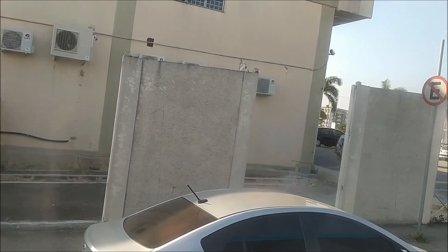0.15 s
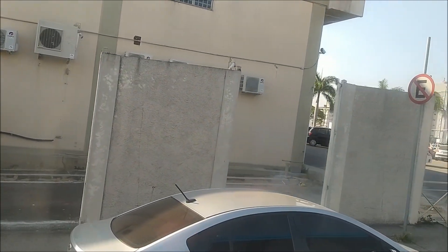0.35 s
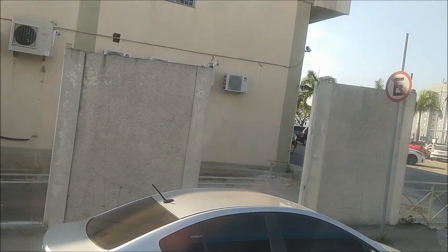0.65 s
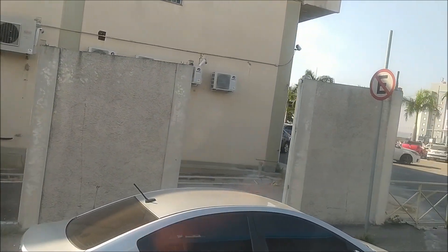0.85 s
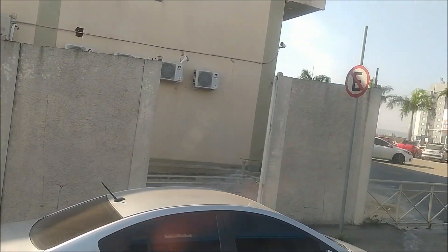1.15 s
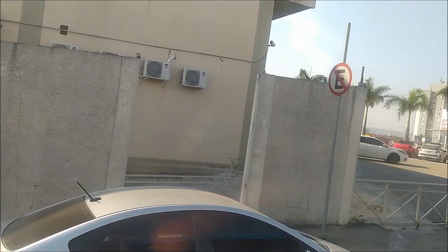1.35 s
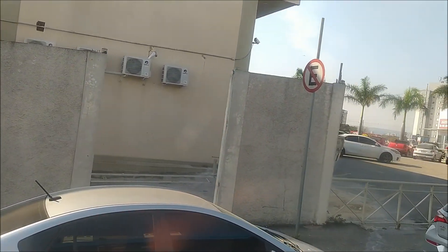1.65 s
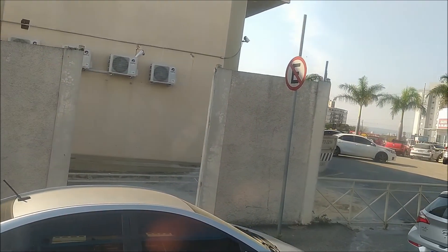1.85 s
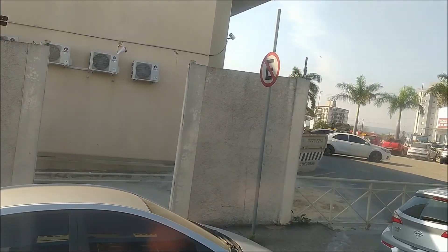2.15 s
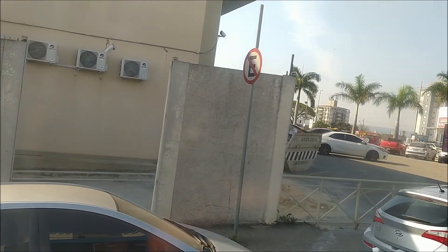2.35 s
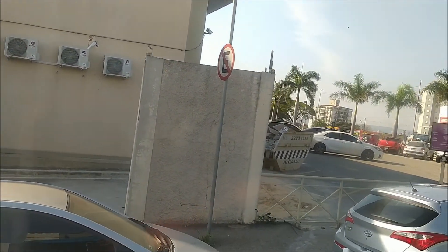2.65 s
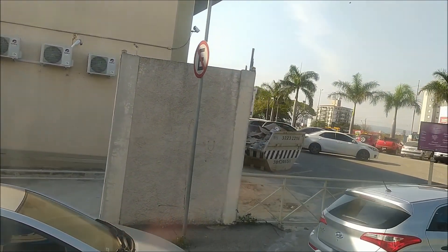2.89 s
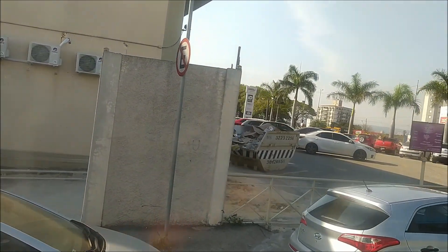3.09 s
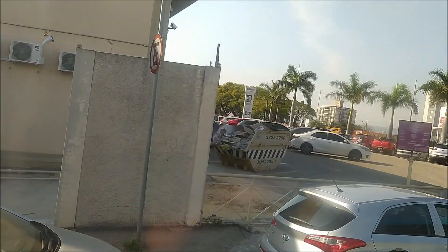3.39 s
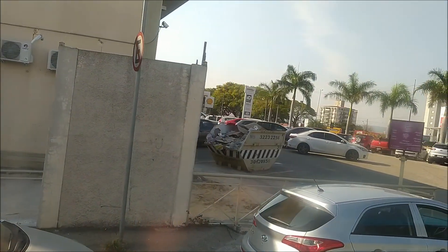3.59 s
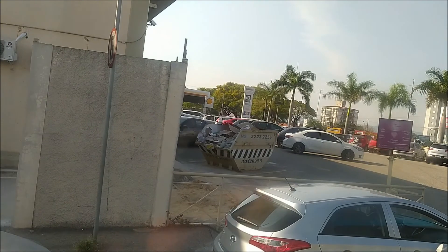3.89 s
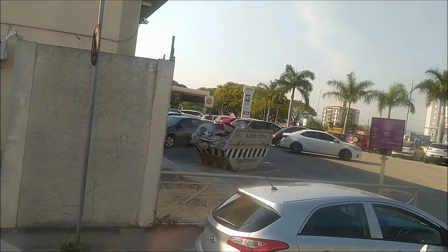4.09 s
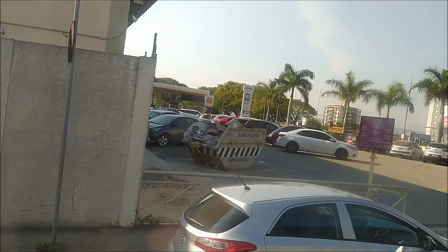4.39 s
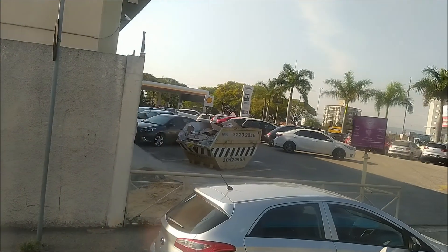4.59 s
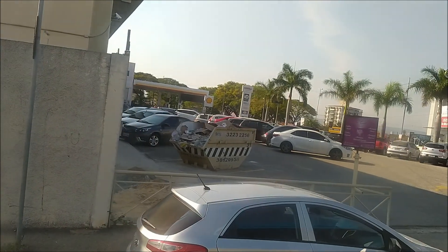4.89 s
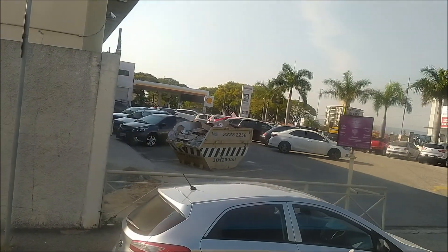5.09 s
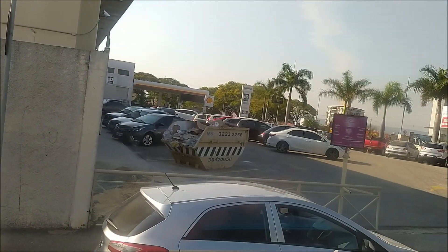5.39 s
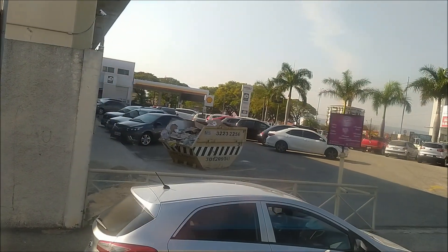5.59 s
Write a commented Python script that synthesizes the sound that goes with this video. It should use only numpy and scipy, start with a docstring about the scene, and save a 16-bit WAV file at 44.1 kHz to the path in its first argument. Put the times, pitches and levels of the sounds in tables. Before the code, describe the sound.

A heavy diesel drone sinks in pitch as road roar fades; at idle, a sharp air-brake hiss ends in falling squeaks.

```python
"""Diesel bus rolling to a stop

Heard from inside the cabin: the engine winds down from a pull to idle, its firing harmonics passed through
frame and floor modes. Road and fan roar is coloured noise ringing the cabin, with hiss and air at the windows.
A short hum slides up near the start and a faint gear whine follows the engine down.
At the stop brake air hisses out as a burst of noise, and the valve squeals in roughened falling tones."""
import sys
import numpy as np
from scipy import signal
from scipy.fft import rfft, irfft
from scipy.io import wavfile
from scipy.ndimage import uniform_filter1d

SR = 44100
rng = np.random.default_rng(int(sys.argv[2]) if len(sys.argv) > 2 else 0)


def int16_out(signal):
    """Quantize to a 16-bit WAV file."""
    q = np.round(np.clip(np.atleast_2d(signal).T, -1, 1) * 32767)
    wavfile.write(sys.argv[1], SR, q.astype(np.int16))


def invert_db(level):
    """Linear amplitude ratio for a level in decibels (20 dB per decade), elementwise."""
    return 10 ** (np.asarray(level, dtype=float) / 20)


N = 253117
TIME = np.arange(N) / SR  # s
FREQ = np.maximum(np.arange(N // 2 + 1) * SR / N, 1)  # Hz

# engine run-down: [t/s, firing rate f/Hz, effort level/dB]
ENGINE_RUN = [(0.0, 56.7, -28), (0.45, 55.4, -23), (0.75, 52.4, -24.5), (0.95, 50.6, -26.5),
              (1.2, 48.1, -25), (1.5, 46.2, -25), (1.95, 44.7, -26), (2.27, 43.9, -27.5),
              (2.49, 42.7, -33.5), (2.61, 40.9, -32), (2.72, 39.5, -31), (2.97, 36.4, -34.5),
              (3.1, 33.7, -36), (3.21, 31.3, -34), (3.33, 29.3, -32), (3.45, 28.9, -31), (4.2, 28.9, -33),
              (5.74, 28.8, -34)]
# cabin air resonances rung by the road: [f/Hz, half-power width/Hz, relative level/dB]
BOOM_MODES = [(30, 55, -10), (91, 40, -10), (150.3, 31.3, -3.5), (183, 37, -5.5)]
# drumming panels: [f/Hz, half-power width/Hz, relative level/dB]
PANEL_MODES = [(232, 35, -7.5), (284, 48.6, -8.5), (366.3, 62, -12), (448, 62, -18.5)]


def unit(x):
    """Scale to an rms of one."""
    return x / np.sqrt(np.mean(x ** 2))


def curves(table):
    """Columns of a table as straight lines in time."""
    s, *columns = np.transpose(table)
    return [np.interp(TIME, s, column) for column in columns]


def shape(points):
    """A (f/Hz, value) table read at every frequency, straight over log frequency."""
    hz, value = np.transpose(points)
    return np.interp(np.log(FREQ), np.log(hz), value)


def walk(rate):
    """Random levels held 1 / rate s and slewed twice; rms one."""
    hold = int(SR / rate)
    steps = np.repeat(rng.standard_normal(N // hold + 1), hold)
    slewed = uniform_filter1d(uniform_filter1d(steps, hold), hold)
    return unit(slewed[:N])


def swell(rows):
    """Smooth bumps in dB from (centre s, length s, dB) rows."""
    return sum(db * np.exp(-(2 * (TIME - s) / length) ** 2) for s, length, db in rows)


def burst(start_s, attack_s, hold_s, fall_db_per_s):
    """Gain that rises, holds and falls away."""
    since = TIME - start_s
    rise = np.clip(since / attack_s, 0, 1) ** 2
    return rise * invert_db(-fall_db_per_s * np.maximum(since - attack_s - hold_s, 0))


def glide(start_s, first_hz, resting_hz, settle_s):
    """Pitch that eases exponentially from its first to its resting value."""
    return resting_hz + (first_hz - resting_hz) * np.exp(-np.maximum(TIME - start_s, 0) / settle_s)


def cabin(hz, modes=BOOM_MODES + PANEL_MODES):
    """Gain of a set of resonances at a frequency, their powers summed."""
    power = sum(invert_db(db) ** 2 / (1 + (2 * (hz - centre) / width) ** 4) for centre, width, db in modes)
    return np.sqrt(power)


def diffuse(gain):
    """Noise of a given colour, mostly alike at both microphones in the bass and unrelated in the treble."""
    # sound field at the microphone pair: [f/Hz, side minus mid level/dB,
    # share of side in step with mid (+ leans left), share a quarter cycle ahead (+ left leads)]
    field = [(60, -39, 0, -.6), (120, -7, -0.16, -.5), (180, -19, -0.62, -.4), (219, 1, 0.17, 0.35),
             (255, -14, -0.33, -0.1), (360, -5.5, -0.37, 0.15), (450, -5, -0.029, -0.099),
             (610, -1, 0.28, .07), (870, 2.5, -0.35, 0.15), (1040, 3.5, -.43, -0.035),
             (1450, 1.5, -0.51, 0.33), (1990, 0, -.15, -0.37), (3400, 0.5, .18, -.08),
             (6460, -1, -0.0063, -1), (10300, -1, -.3, 0), (11600, 0, 0.83, 0), (14000, -0.5, 0.35, 1)]
    mid, other = rfft(rng.standard_normal((2, N))) * gain
    side_db, lean, lead = (shape(np.array(field)[:, [0, k]]) for k in range(1, 4))
    free = np.sqrt(np.clip(1 - lean ** 2 - lead ** 2, 0, 1))
    side = invert_db(side_db) * ((lean + 1j * lead) * mid + free * other)
    pair = irfft(np.array([mid + side, mid - side]), N)
    # the mid has an rms of one
    return pair / np.sqrt(np.mean(pair.mean(axis=0) ** 2))


def roar(road_db):
    """Road and fan noise ring the cabin; the window air flickers with small gusts."""
    # ringing seats, rails and glass: [f/Hz, half-power width/Hz, level over the body noise/dB]
    fittings = [(654, 16, -8.5), (986, 130, -14.5), (1030, 6.1, -19), (1405, 38, -8), (1903, 28, -0.5),
                (2036, 30, -1)]
    # body and road noise colour: [f/Hz, relative level per Hz/dB]
    body_colour = [(250, -39), (420, -7), (532, -6.5), (590, -6), (747, -12), (1010, -12), (1220, -20.5),
                   (1390, -18), (1790, -20.5), (1970, -21), (2190, -20), (2380, -24.5), (4000, -34.5),
                   (5200, -54), (8800, -120)]
    # lower hiss at the windows: [f/Hz, relative level per Hz/dB]
    hiss_colour = [(2060, -12), (3500, -8.5), (3760, -6), (4320, -4.5), (4950, -1), (5720, -3),
                   (6640, -3.5), (7470, -5), (8000, -3), (10400, -13), (17600, -120)]
    # air rushing at the windows: [f/Hz, relative level per Hz/dB]
    air_colour = [(4120, -41), (7000, -7), (7490, -9.5), (9890, 1), (11000, 0.5), (11600, -3), (12900, -17),
                  (14100, -10.5)]
    # the boom swells or sinks for a while: [centre t/s, length/s, level/dB]
    boom_swells = [(0.09, 0.09, 4.5), (1.272, 0.09, -0.5), (2.053, 1.08, -5), (2.823, 0.53, 3),
                   (3.273, 0.13, -3.5), (4.9, 1.3, -4)]
    # each noise at the loudest road level (dB) and the share of the road's fall that it follows
    boom_db, boom_share, panel_db, panel_share = -24.5, 0.96, -29.5, 0.99
    air_db, air_share, hiss_db, hiss_share = -52, 0.88, -55.5, 1

    fall_db = road_db - road_db.max()
    boom_level_db = boom_db + boom_share * fall_db + swell(boom_swells) + 0.82 * walk(8.1)
    boom = invert_db(boom_level_db) * diffuse(cabin(FREQ, BOOM_MODES))
    panel_level_db = panel_db + panel_share * fall_db + 1.44 * walk(8)
    panels = invert_db(panel_level_db) * diffuse(cabin(FREQ, PANEL_MODES))
    ringing = 1 + cabin(FREQ, fittings)
    body = invert_db(road_db + 0.37 * walk(10)) * diffuse(ringing * invert_db(shape(body_colour)))
    # the same gusts move the air and, half as far in dB, the hiss
    gusts_db = 1.4 * walk(14)
    hiss_level_db = hiss_db + hiss_share * fall_db + 0.5 * gusts_db + 0.74 * walk(6)
    hiss = invert_db(hiss_level_db) * diffuse(invert_db(shape(hiss_colour)))
    air = invert_db(air_db + air_share * fall_db + gusts_db) * diffuse(invert_db(shape(air_colour)))
    return boom + panels + body + hiss + air


def hum():
    """A clean tone gliding up towards its resting pitch as it fades, equal at both microphones."""
    # the hum: [start t/s, hold/s, first f/Hz, resting f/Hz, level/dB]
    hum_note = (0.13, 0, 146.5, 166.5, -18)
    rise_s, attack_s, fall_db_per_s = 0.117, 0.034, 81
    s, hold_s, first_hz, resting_hz, db = hum_note
    hz = glide(s, first_hz, resting_hz, rise_s)
    gain = np.sqrt(2) * invert_db(db) * burst(s, attack_s, hold_s, fall_db_per_s)
    return gain * np.sin(2 * np.pi * np.cumsum(hz) / SR)


def gear():
    """A faint whine at a multiple of the firing rate, louder where it crosses a ringing rail."""
    # ringing rail: [f/Hz, half-power width/Hz, level over the plain whine/dB]
    rail = [(1895, 16, 7)]
    multiple, level_db = 41.9, -64
    from_s, until_s, fade_s = 1.15, 2.3, .2  # fades in after from_s and out after until_s
    hz = multiple * curves(ENGINE_RUN)[0]
    engaged = np.clip(np.minimum(TIME - from_s, until_s + fade_s - TIME) / fade_s, 0, 1)
    gain = np.sqrt(2) * engaged * invert_db(level_db + 2.5 * walk(10)) * (1 + cabin(hz, rail))
    turn = 2 * np.pi * np.cumsum(hz) / SR + .5 * walk(10)
    apart = np.array([[0], [1.2]])  # phase at the left and right microphone, rad
    return gain * np.sin(turn + apart)


def whistle(hz, gain, rough_hz, spread):
    """A gliding tone whose size and phase wander within a narrow band, partly alike left and right."""
    turn = 2 * np.pi * np.cumsum(hz) / SR

    def rough_tone():
        return gain * (walk(rough_hz) * np.cos(turn) + walk(rough_hz) * np.sin(turn))

    mid, side = rough_tone(), rough_tone()
    return np.array([mid + spread * side, mid - spread * side])


def brake():
    """Air rushes from the brake valve, opening fast and dying away; the valve squeals as it closes."""
    # colour of the air: [f/Hz, relative level per Hz/dB]
    air_burst = [(2650, -34.5), (4500, -17), (4810, -21), (5540, 2.5), (8010, 4), (8680, 3), (10900, 7.5),
                 (13000, -12)]
    # squeals, each dropping in pitch: [start t/s, hold/s, first f/Hz, resting f/Hz, level/dB]
    squeals = [(5.07, .07, 8300, 7200, -51), (5.13, .075, 6600, 6100, -53)]
    air_db, squeal_drop_s = -53.5, .04
    flow = burst(4.815, attack_s=0.012, hold_s=0.24, fall_db_per_s=78)
    out = invert_db(air_db) * flow * diffuse(invert_db(shape(air_burst)))
    for s, hold_s, first_hz, resting_hz, db in squeals:
        hz = glide(s, first_hz, resting_hz, squeal_drop_s)
        gain = invert_db(db) * burst(s, attack_s=.03, hold_s=hold_s, fall_db_per_s=230)
        # the valve chatters, so the narrow part flutters fast in level
        narrow = invert_db(2 * walk(120)) * whistle(hz, gain, rough_hz=450, spread=.7)
        breathy = whistle(hz, gain, rough_hz=2000, spread=.9)
        out = out + narrow + invert_db(-5) * breathy
    return out


def engine(load_db, wander=.0015, flutter_db=.3, uneven_flutter_db=2.5):
    """Steady firings heard as harmonics, each reaching the two microphones a little differently."""
    # harmonics 1 to 6 of the firing rate: [level over the effort, ahead of the frame/dB]
    harmonics_db = [2.7, 6.6, -6.5, -2.6, -8.9, -8.3]
    # frame and floor modes the harmonics pass as the engine slows: [f/Hz, half-power width/Hz, level/dB]
    frame_modes = [(30.2, 3.6, 1.1), (46.4, 12.8, -6.1), (85.8, 5.3, 1.1), (94, 7, -11), (112.2, 17, -10.2),
                   (143.7, 5.3, 2), (162.4, 15.5, 1.1), (178.7, 8.6, 9.2), (191.1, 11.2, .7),
                   (209.3, 8.5, 2.9), (228.4, 9.4, -7.6), (275, 47.6, -5.6)]
    between_db = -12  # frame response between the modes
    # cabin modes in opposite phase left and right: [f/Hz, half-power width/Hz, level over the effort/dB]
    sideways = [(182.5, 11, -10.5), (207, 8, -5), (220.8, 6.1, -2)]
    # a single harmonic wavers for a while: [harmonic, centre t/s, length/s, level/dB]
    wavers = [(3, .4, .35, 6), (2, .5, .25, -2), (1, .85, .3, 3), (2, 1.0, .15, -7), (6, 1.4, .5, 4),
              (4, 2.3, .12, 3), (5, 3.5, .3, 6), (1, 3.6, .6, 2), (6, 3.75, .2, 3), (3, 4.3, .5, 6),
              (2, 4.45, .2, -8), (5, 4.95, .5, 7), (3, 5.0, .3, -6), (6, 5.3, .6, 6), (2, 5.4, .5, 2),
              (3, 5.55, .6, 5), (5, 5.5, .3, -10)]
    # uneven cylinders and upper harmonics: [multiple of firing rate, level at full roar ahead of the cabin/dB]
    uneven = [(1.5, -39), (2.5, -48), (3.5, -42), (4.5, -53), (5.5, -30.5), (6.5, -34), (7, -42),
              (8, -29.5), (9, -32.5), (10, -39.5), (11, -39), (13, -26)]

    hz, effort_db = curves(ENGINE_RUN)
    turn = 2 * np.pi * np.cumsum(hz * (1 + wander * walk(9.02))) / SR
    mid, side = 0, 0
    for k, db in enumerate(harmonics_db, 1):
        # harmonics crest roughly together, one pressure peak a firing, drifting with the cabin response
        phase = k * turn + .25 * (k - 1) * walk(1.5)
        frame = np.hypot(cabin(k * hz, frame_modes), invert_db(between_db))
        waver_db = swell(row[1:] for row in wavers if row[0] == k)
        level_db = effort_db + db + waver_db + flutter_db * np.sqrt(k) * walk(5.9)
        gain = np.sqrt(2) * invert_db(level_db) * frame
        mid = mid + gain * np.cos(phase)
        # the left microphone hears each harmonic slightly late and slightly weaker
        side = side + gain * (0.086 * np.sin(phase) - 0.0062 * k * np.cos(phase))
        if k == 4:
            # sideways modes carry this harmonic in opposite phase left and right
            sway = np.sqrt(2) * invert_db(effort_db) * cabin(k * hz, sideways)
            side = side - sway * np.cos(phase - .6)
    for multiple, db in uneven:
        wave = np.cos(multiple * turn + rng.uniform(0, 2 * np.pi) + 0.58 * walk(4.4))
        level_db = db + load_db + uneven_flutter_db * walk(4.6)
        wave = invert_db(level_db) * cabin(multiple * hz) * wave
        mid, side = mid + wave, side - 0.21 * wave  # weaker on the left
    return np.array([mid + side, mid - side])


def scene():
    """Engine, roar, hum, gear whine and brake, as heard in the cabin."""
    # road noise dying away as the bus rolls to a stop: [t/s, level/dB]
    road = [(0.0, -37.5), (0.5, -37.5), (1.3, -39.5), (2.3, -40.5), (2.9, -43), (3.2, -45), (3.5, -45.5),
            (5.74, -45.5)]
    road_db, = curves(road)
    load_db = 0.68 * (road_db - road_db.max())
    return engine(load_db) + roar(road_db) + hum() + gear() + brake()


def roll_off(x):
    """The treble ends steeply here."""
    return signal.sosfilt(signal.butter(12, 14260, fs=SR, output="sos"), x)


def record(dry):
    """A phone microphone pair in the cabin takes the mix at its own level."""
    return roll_off(dry)


dry = scene()
out = record(dry)
int16_out(out)
```